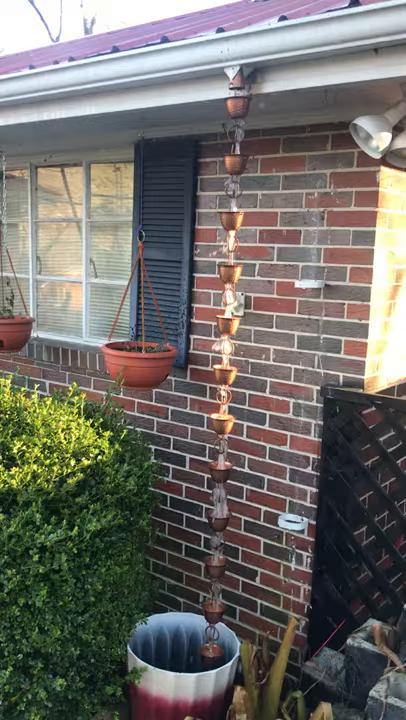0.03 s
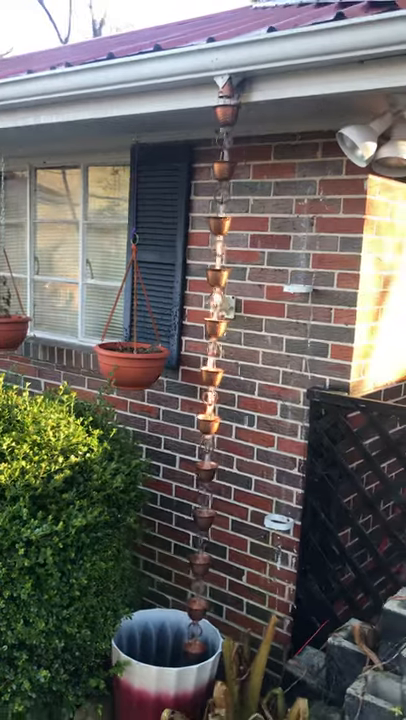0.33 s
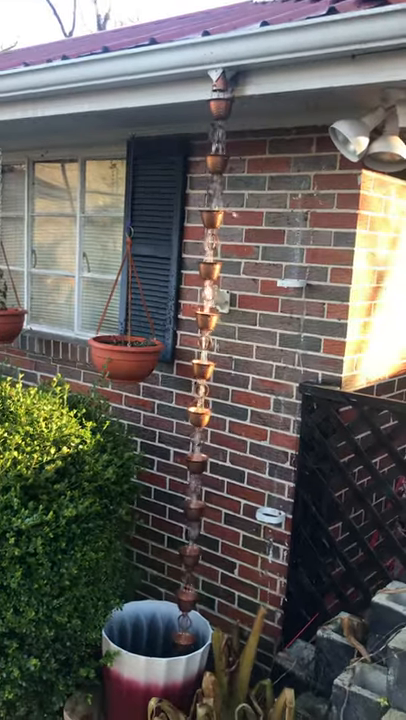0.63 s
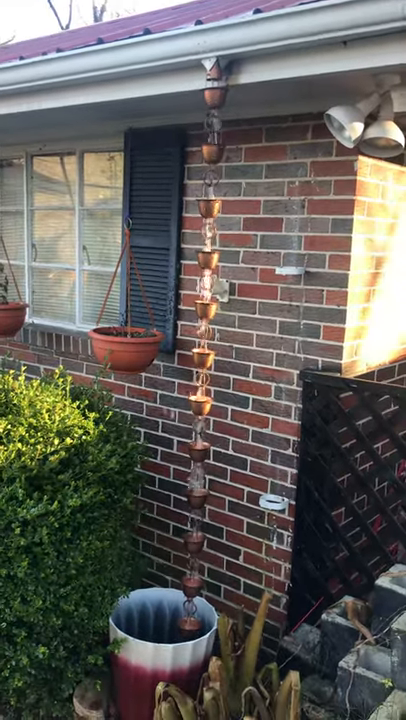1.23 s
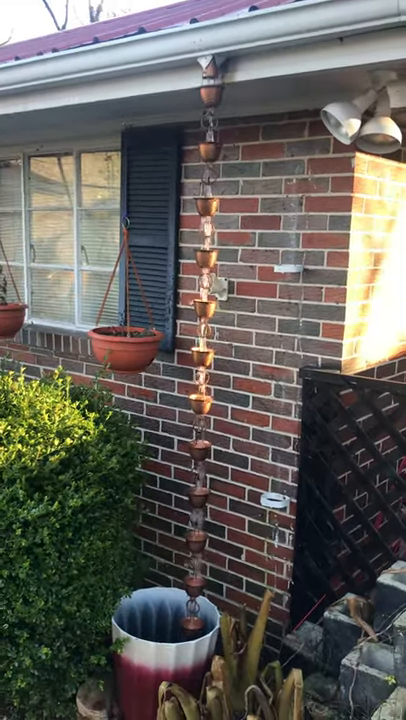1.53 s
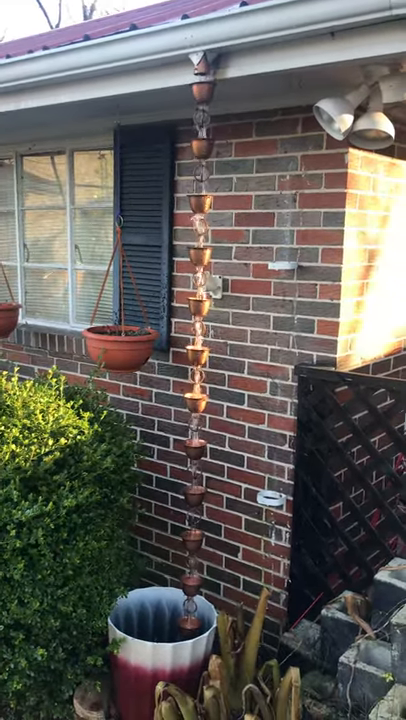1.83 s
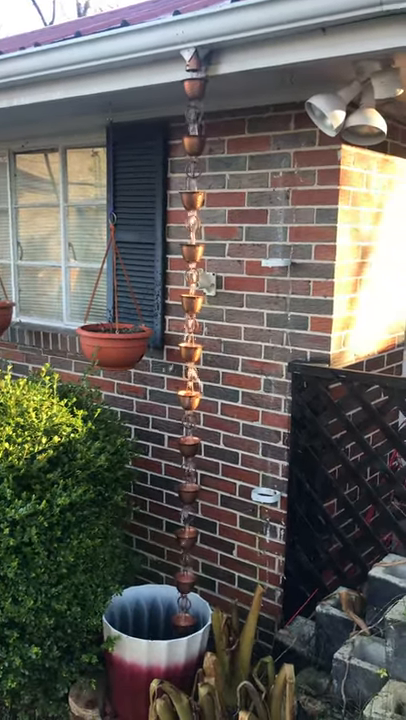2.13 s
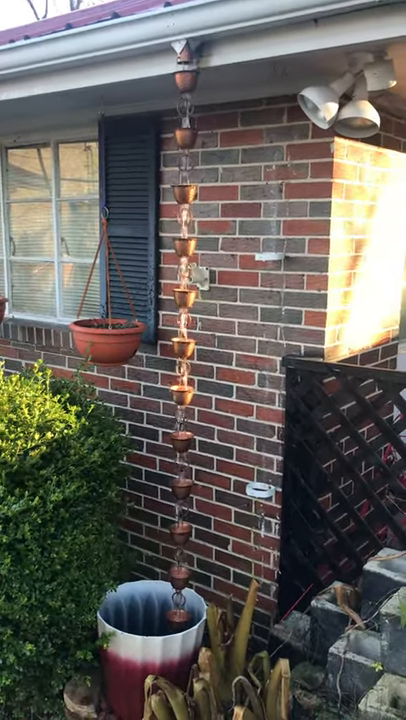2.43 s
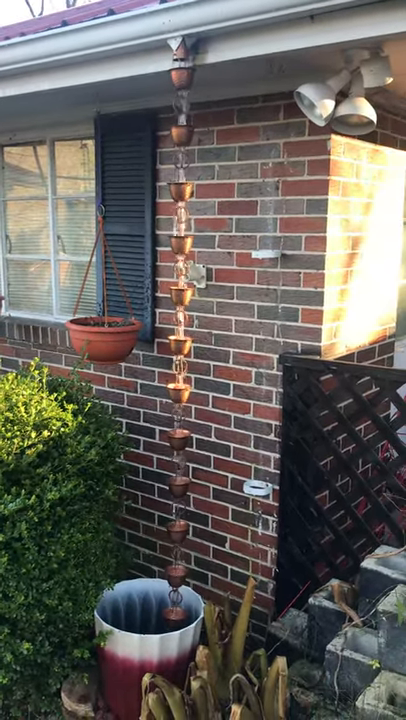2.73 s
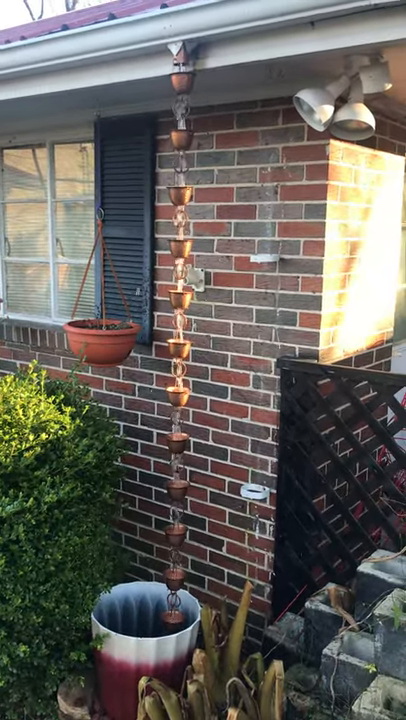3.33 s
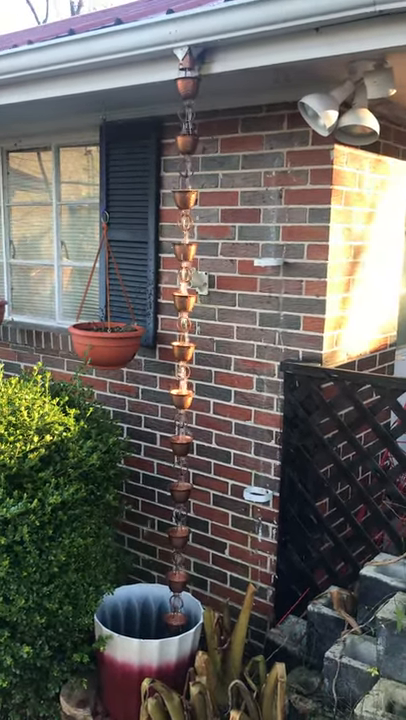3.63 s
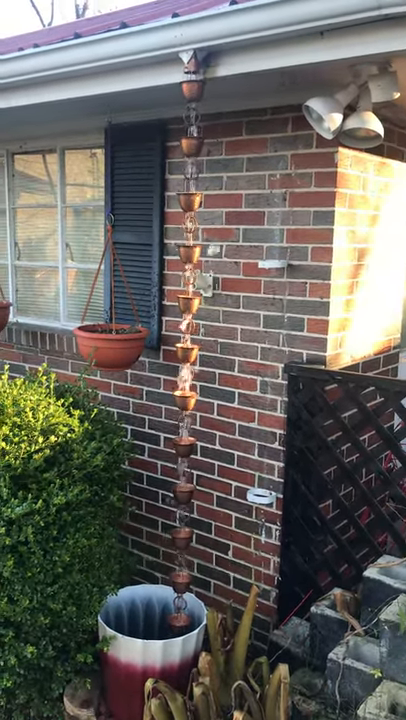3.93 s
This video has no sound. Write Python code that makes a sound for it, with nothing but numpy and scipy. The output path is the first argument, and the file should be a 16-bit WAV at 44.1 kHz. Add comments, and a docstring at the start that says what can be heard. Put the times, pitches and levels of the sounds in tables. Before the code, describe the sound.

Water trickles steadily down a hanging chain of metal cups, dripping into a pot.

```python
"""Outdoors beside a brick wall, one microphone near a chain of copper cups that drains into a tall pot.
Over a low rumble, water trickles from cup to cup; fine spray patters and hisses, tiny bubbles ping.
Single drops splat on the cups and heavier ones plop into the pot, each with short echoes off the wall.
Near 2.9 s a steadier stream reaches the pot, drums in its hollow and sets its side ringing faintly."""
import sys
import numpy as np
from scipy import signal
from scipy.fft import rfft, irfft, next_fast_len
from scipy.io import wavfile
from scipy.ndimage import uniform_filter1d, map_coordinates

SR = 44100
rng = np.random.default_rng(int(sys.argv[2]) if len(sys.argv) > 2 else 0)


def bounce(signal):
    """Save signal as a 16-bit WAV file at the path given by the first command-line argument."""
    frames = np.transpose(np.atleast_2d(signal))
    limited = np.clip(frames, -1, 1)
    pcm = np.round(limited * 32767).astype(np.int16)
    wavfile.write(sys.argv[1], SR, pcm)


N = 176400  # 4 s


def amp(db):
    """Decibels to gain."""
    return 10 ** (np.asarray(db) / 20)


def unit(x):
    """Scale to rms 1."""
    return x / np.sqrt(np.mean(x ** 2) + 1e-20)


def curve(rows):
    """Join (time_s, value) points, one value per sample."""
    return np.interp(np.arange(N) / SR, *np.transpose(rows))


def wobble(rate_hz, size=N):
    """A smooth random curve with rate_hz knots a second."""
    knots = rng.standard_normal(int(size * rate_hz / SR) + 4)
    return map_coordinates(knots, [np.arange(size) * rate_hz / SR])


def colour(x, points, rings=()):
    """Causal filter through (freq_hz, gain_db) points, with narrow rings on top; rms 1."""
    size = 2 * next_fast_len(N // 2 + SR // 4)
    hz = np.fft.rfftfreq(size, 1 / SR)
    point_hz, point_db = np.transpose(points)
    db = np.interp(np.log(hz + 1), np.log(point_hz), point_db)
    db += sum(boost / (1 + (2 * (hz - centre) / width) ** 2) for centre, width, boost in rings)
    cepstrum = irfft(np.log(amp(db)))
    cepstrum[1:size // 2] *= 2  # fold to minimum phase
    cepstrum[size // 2 + 1:] = 0
    return unit(irfft(rfft(x, size) * np.exp(rfft(cepstrum)))[:N])


def band(size, hz, octaves):
    """Noise around one frequency; rms 1."""
    away = np.log2((np.fft.rfftfreq(size, 1 / SR) + 1) / hz) / octaves
    return unit(irfft(rfft(rng.standard_normal(size)) * np.exp(-away ** 2 / 2), size))


def fade(t, attack_s, t60_s):
    """Quick rise, exponential decay."""
    return (1 - np.exp(-t / attack_s)) * np.exp(-np.log(1000) * t / t60_s)


def burst(carrier, envelope):
    """A carrier under an envelope, with the energy of the envelope alone."""
    return unit(carrier * envelope) * np.sqrt(np.mean(envelope ** 2))


def add(out, start_s, sound):
    """Mix a sound in at start_s."""
    i = max(round(start_s * SR), 0)
    out[i:i + len(sound)] += sound[:N - i]


def patchy(x, depth_db):
    """Each region of frequency swells and fades on its own."""
    spectra = signal.stft(x, nperseg=256)[2]
    swell = uniform_filter1d(rng.standard_normal(spectra.shape), size=7, axis=0)
    swell = uniform_filter1d(swell, size=11, axis=1)
    return unit(signal.istft(spectra * amp(depth_db * unit(swell)), nperseg=256)[1][:N])


def droplets(count, spread_db, clump_db, hiss_db):
    """Tiny impacts of unequal size tick in clumps over a fine hiss."""
    when, rank, sign = rng.random((count, 3)).T
    strength = amp(-spread_db * np.log(rank + .015))
    ticks = np.bincount((when * N).astype(int), strength * np.sign(sign - .5), N)
    return unit(ticks * amp(clump_db * wobble(90))) + amp(hiss_db) * rng.standard_normal(N)


def bubbles(count, hz, octaves, cycles, spread_db, rise):
    """Small bubbles ring at random: damped sines that rise in pitch."""
    when, rank, life = rng.random((count, 3)).T[:, :, None]
    pitch_hz = np.clip(hz * 2 ** (octaves * rng.standard_normal((count, 1))), 300, 14000)
    samples = np.arange(1024)
    turns = pitch_hz * samples / SR
    age = turns / (cycles * (.5 + life))  # 1 when 60 dB down
    strength = amp(-spread_db * np.log(rank + .03))
    envelope = strength * np.exp(-np.log(1000) * age) * (1 - np.exp(-turns))
    rings = envelope * np.sin(2 * np.pi * turns * (1 + rise * age / 2))
    places = (when * N).astype(int) + samples
    return unit(np.bincount(places.ravel(), rings.ravel(), N)[:N])


# Spectrum of the open air around the microphone: freq_hz, gain_db
RUMBLE_SPECTRUM = [(20, -32), (32, -26), (42, -8), (55, 2), (85, 0.5), (120, -5.5), (160, -12), (200, -10),
                   (280, -17), (450, -19.5), (1500, -28)]

def rumble(level_db=-50.5):
    """Low outdoor background, wavering slightly."""
    return amp(level_db + wobble(7.2)) * colour(rng.standard_normal(N), RUMBLE_SPECTRUM)


# Echoes from the nearby wall, eaves and ground: delay_s, gain_db
ECHOES = [(.0034, -18), (0.0107, -15), (.0165, -33)]

def yard(x, tail_db):
    """The direct sound reaches the microphone, then near echoes and a short open-air tail."""
    t = np.arange(SR // 4) / SR
    tail = rng.standard_normal(len(t)) * fade(t, attack_s=.0045, t60_s=.18)
    response = amp(tail_db) * tail / np.linalg.norm(tail)
    for delay_s, db in ECHOES:
        response[round(delay_s * SR)] += amp(db)
    return x + signal.fftconvolve(x, response)[:N]


# Ringing of the pot's side: time_s, level_db
RING_LEVEL = [(0, -77), (2.85, -83), (3.05, -63), (3.35, -53.5), (3.6, -57.5), (4, -64)]

def pot_ring():
    """The stream keeps the pot's side singing faintly on three close notes."""
    notes = [(1778, -3), (1905, -3), (2040, -7.5)]  # pitch_hz, gain_db
    return amp(curve(RING_LEVEL)) * sum(amp(db) * band(N, hz, octaves=.018) for hz, db in notes)


# Stream falling into the pot at the foot of the chain: time_s, level_db
POUR_LEVEL = [(0, -55), (1.2, -59.5), (2.1, -60), (2.6, -55), (2.9, -53.5), (2.98, -48), (3.3, -51.5),
              (3.7, -51), (4, -51.5)]
# Resonances of the hollow pot: freq_hz, gain_db
POT_SPECTRUM = [(60, -9.5), (115, 9.5), (160, -0.5), (200, -3), (300, -2.5), (440, -5.5), (600, 2.5),
                (820, -3), (1050, 0), (1400, 1), (1560, -5.5), (2050, -1.5), (2600, -5.5), (4000, -7),
                (9000, -26)]

def pour():
    """The stream drums in the hollow pot and churns up bubbles."""
    drumming = colour(droplets(count=7000, spread_db=3, clump_db=1.8, hiss_db=-3), POT_SPECTRUM)
    gurgle = bubbles(count=300, hz=1203, octaves=.495, cycles=35, spread_db=4.5, rise=.12)
    return amp(curve(POUR_LEVEL)) * (amp(1.5) * drumming + amp(-8.5) * gurgle)


# Tiny bubbles in the cups: start_s, level_db, pitch_hz
CUP_BUBBLES = [(1.726, -41, 2940), (2.185, -48, 7900), (2.215, -48, 7750), (2.241, -46, 2594),
               (2.505, -39.5, 3430), (2.716, -42, 8400), (2.886, -46, 7700), (2.905, -50, 7300),
               (3.555, -42, 7650), (3.63, -44, 8260), (3.705, -40.5, 9600)]

def pings():
    """Single tiny bubbles ring briefly with a fuzzy, high note."""
    out, t = np.zeros(N), np.arange(SR // 12) / SR
    envelope = fade(t, attack_s=.004, t60_s=.07)
    for start_s, db, hz in CUP_BUBBLES:
        add(out, start_s, amp(db) * band(len(t), hz, octaves=.025) * envelope)
    return out


# Drops plunging into the pot: start_s, level_db, pitch_hz, t60_s, splash_share
POT_DROPS = [(.04, -31, 770, 0.046, 0.81), (.123, -39.5, 521, 0.046, .3), (.221, -34.5, 1270, 0.04, 0),
             (.25, -38, 1670, 0.043, 0.8), (0.348, -34, 1320, 0.036, .2), (.955, -36.5, 1300, .05, 0.2),
             (1.397, -43, 1420, .04, 0.05), (1.172, -37, 1400, 0.029, 0.96),
             (1.262, -36.5, 1420, 0.025, 0.6), (1.437, -36, 495, 0.037, 0.13),
             (1.533, -28.5, 733, 0.032, 0.54), (1.619, -40, 1170, 0.028, 0.2),
             (1.644, -44.5, 1410, 0.074, 0.03), (2.136, -46, 720, 0.072, 0.44),
             (2.32, -24.5, 1257, 0.021, 0.22), (2.4, -33, 1052, 0.043, 0.46), (2.401, -36, 740, 0.037, 0.4),
             (2.727, -41, 1680, 0.042, 0.1), (2.924, -37, 1560, .06, 0.8), (3.006, -28.5, 966, 0.029, 0.8),
             (3.008, -35.5, 310, 0.043, .9), (3.275, -39, 1440, .04, 0.6), (3.398, -36.5, 760, 0.044, 0.4)]

def plops(rise=.085):
    """Each heavy drop traps a ringing bubble that rises in pitch, and throws up a dull splash."""
    out, t = np.zeros(N), np.arange(SR // 8) / SR
    for start_s, db, hz, t60_s, splash_share in POT_DROPS:
        bubble = unit(np.sin(2 * np.pi * hz * t * (1 + rise * t / t60_s / 2)))
        splash = band(len(t), hz, octaves=.45)
        plop = np.sqrt(1 - splash_share) * bubble + np.sqrt(splash_share) * splash
        add(out, start_s, amp(db) * burst(plop, fade(t, attack_s=.0031, t60_s=t60_s)))
    return out


# Drops striking the cups: start_s, level_db, centre_hz, t60_s
CUP_DROPS = [(0.04, -31, 6000, 0.045), (.518, -28.5, 9050, 0.041), (.5215, -29, 10000, .02),
             (.53, -23, 5200, 0.0071), (.59, -28, 3180, 0.0046), (0.8451, -19, 11000, 0.0084),
             (.921, -41, 3800, 0.044), (0.999, -34, 11000, .02), (1.1514, -38.5, 7960, 0.029),
             (1.1788, -38.5, 11500, 0.029), (1.536, -30, 4940, 0.025), (1.548, -38, 5500, 0.033),
             (1.669, -50, 6000, .03), (1.7003, -37.5, 8900, .04), (1.724, -39, 3480, 0.025),
             (2.0214, -40.5, 6200, 0.057), (2.4962, -33, 7500, 0.014), (2.4995, -29, 7050, 0.014),
             (2.508, -37, 4500, .02), (3.0356, -39, 11000, 0.027), (3.8514, -38, 7000, 0.039),
             (3.89, -38, 14500, .025)]

def splats():
    """Each larger drop bursts on a cup in a bright puff of droplets."""
    out, t = np.zeros(N), np.arange(SR // 10) / SR
    for start_s, db, hz, t60_s in CUP_DROPS:
        puff = band(len(t), hz, octaves=.59)
        add(out, start_s, amp(db) * burst(puff, fade(t, attack_s=.00046, t60_s=t60_s)))
    return out


# Mist thrown off the cups: time_s, level_db
SPRAY_LEVEL = [(0, -46.5), (.5, -50.5), (.62, -47), (.8, -50), (1.15, -50), (1.35, -51), (1.68, -51.5),
               (1.8, -57), (2.02, -51), (2.35, -54.5), (2.47, -50), (2.8, -52), (3.05, -49.5), (3.3, -50.5),
               (3.6, -50), (4, -51)]
# Spectrum of its patter: freq_hz, gain_db
SPRAY_SPECTRUM = [(800, -20), (3000, -11), (4800, -4), (6000, 0), (8300, 0.5), (9600, 0), (10400, -6),
                  (11500, 2.5), (15500, -1.5)]
# Copper cups ringing under it: centre_hz, width_hz, boost_db
CUP_RINGS = [(8278, 92, 6), (9500, 110, 5)]

def spray():
    """Fine mist patters brightly on the copper amid a fizz of bubbles."""
    patter = droplets(count=9000, spread_db=2.5, clump_db=4, hiss_db=1)
    mist = colour(patchy(patter, depth_db=3), SPRAY_SPECTRUM, CUP_RINGS)
    fizz = bubbles(count=500, hz=8040, octaves=.43, cycles=360, spread_db=6, rise=.025)
    return amp(curve(SPRAY_LEVEL) + .89 * wobble(25.47)) * (mist + amp(-14.5) * fizz)


# Flow down the chain: time_s, level_db
FLOW_LEVEL = [(0, -47.5), (.6, -48.5), (1.0, -49.5), (1.35, -49.5), (1.68, -48.5), (1.8, -53.5),
              (1.92, -49.5), (2.05, -51.5), (2.15, -52.5), (2.35, -53.5), (2.47, -50), (2.58, -57),
              (2.8, -53.5), (3.05, -50.5), (3.5, -51), (4, -50.5)]
# Spectrum of the running water: freq_hz, gain_db
TRICKLE_SPECTRUM = [(200, -12.5), (500, -9), (1200, -2), (2100, -3.5), (2800, -0.5), (3400, 1),
                    (4200, -0.5), (4800, -3.5), (5800, -1.5), (8000, -7), (10400, -10.5), (15500, -17)]

def trickle():
    """Water spills unevenly from cup to cup, tinkling with small bubbles."""
    patter = droplets(count=7000, spread_db=3.5, clump_db=2.5, hiss_db=-1)
    water = colour(patchy(patter, depth_db=2.5), TRICKLE_SPECTRUM)
    tinkle = bubbles(count=500, hz=3324, octaves=.255, cycles=100, spread_db=2, rise=.029)
    return amp(curve(FLOW_LEVEL) + 1.4 * wobble(17)) * (water + amp(-10) * tinkle)


def scene():
    """Background, pot and chain at one microphone, alike in both channels; the splats are nearly dry."""
    background = rumble()
    in_pot = pot_ring() + pour() + yard(plops(), tail_db=-8.5)
    on_cups = pings() + yard(splats(), tail_db=-13)
    chain = (spray() + trickle()) * amp(.13 * wobble(11))
    mono = background + in_pot + on_cups + chain
    return np.array([mono, mono])


def record(dry, open_s=.036, top_hz=15900):
    """The microphone opens after a moment and keeps nothing above its band limit."""
    size = next_fast_len(N + SR // 2)
    opened = dry * (np.arange(N) / SR > open_s)
    passband = np.fft.rfftfreq(size, 1 / SR) < top_hz
    return irfft(rfft(opened, size) * passband, size)[:, :N]


dry = scene()
out = record(dry)
bounce(out)
```